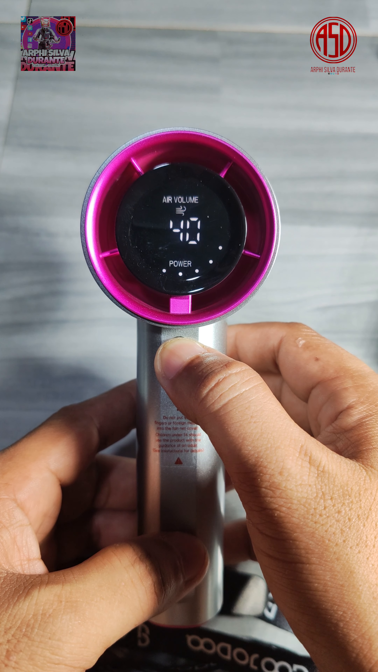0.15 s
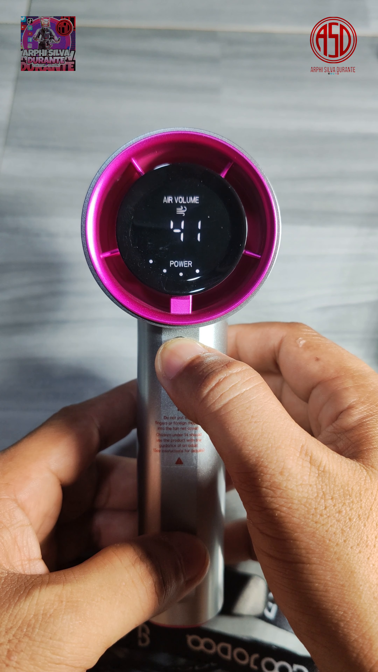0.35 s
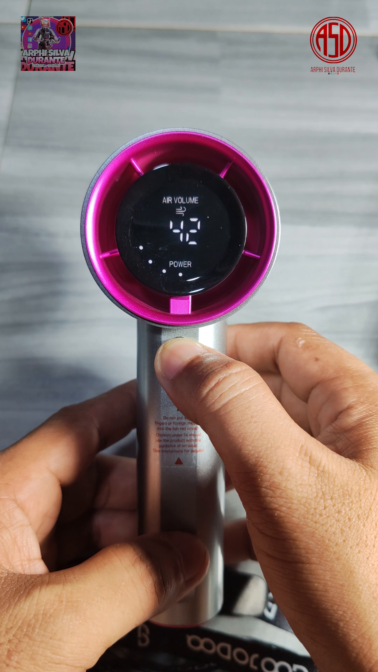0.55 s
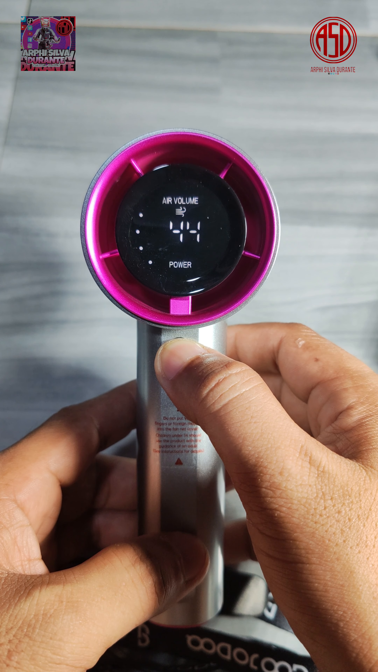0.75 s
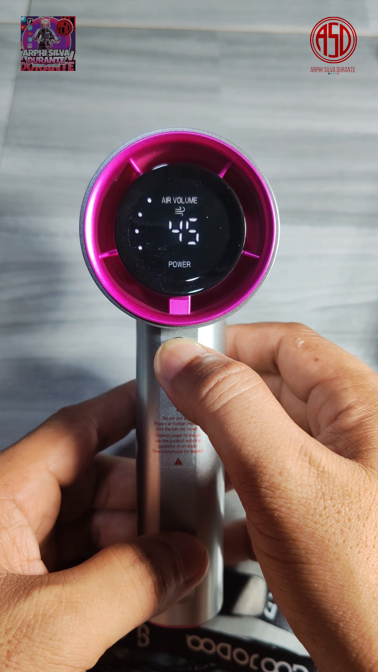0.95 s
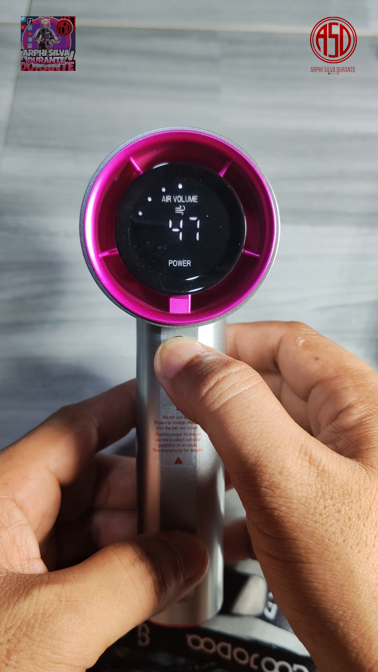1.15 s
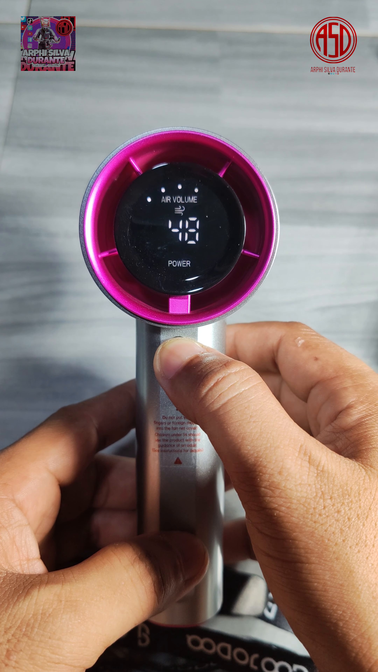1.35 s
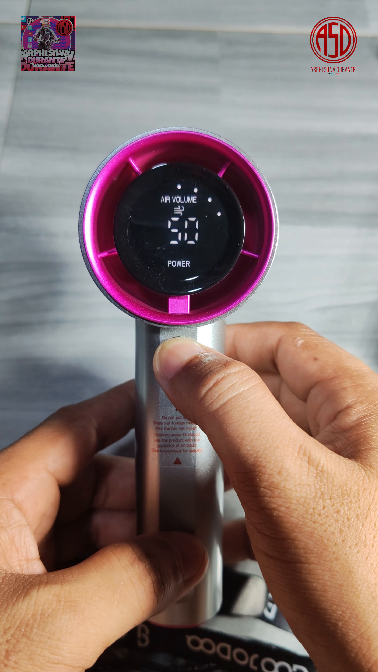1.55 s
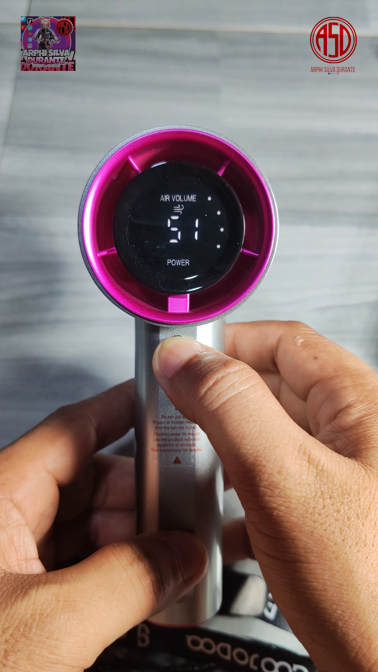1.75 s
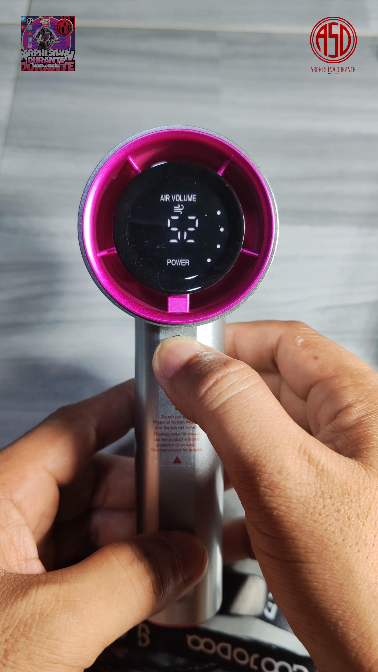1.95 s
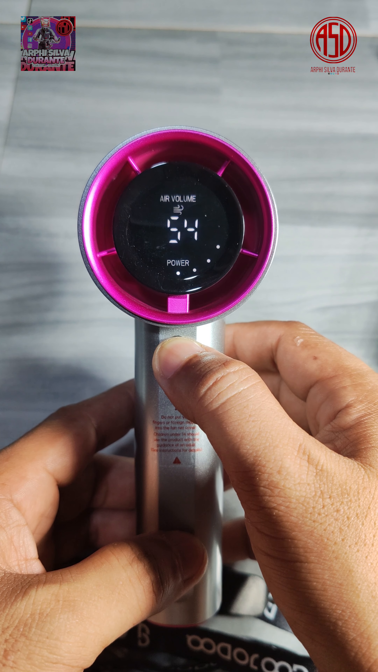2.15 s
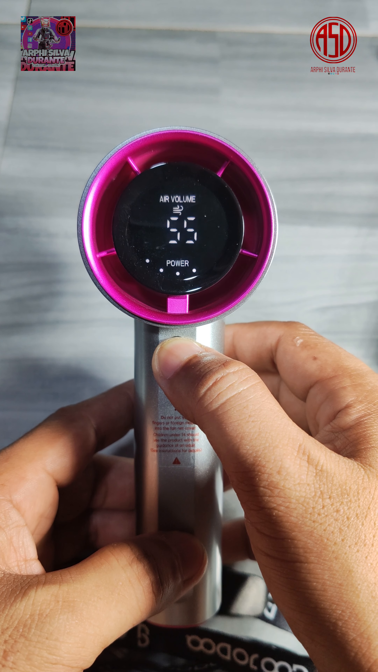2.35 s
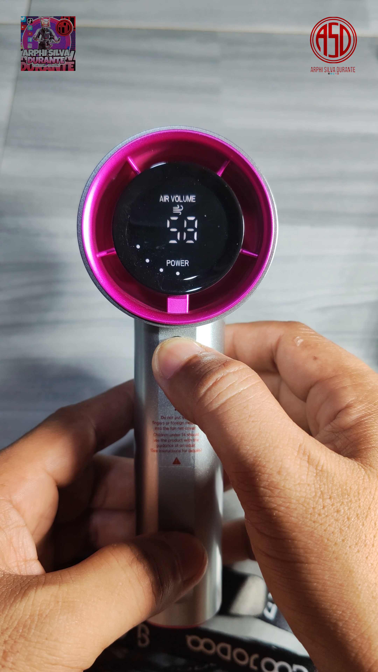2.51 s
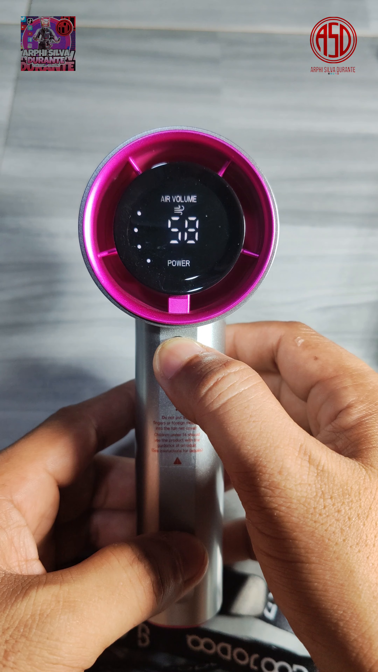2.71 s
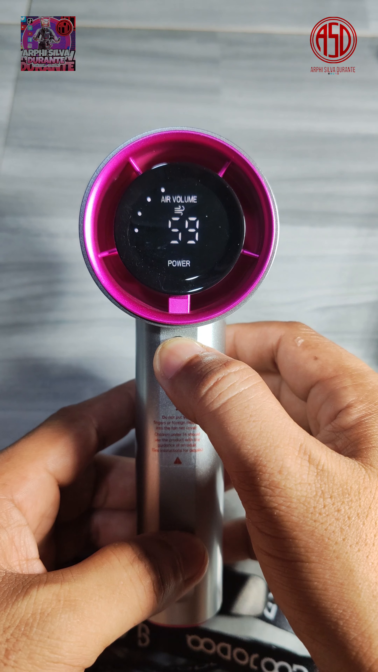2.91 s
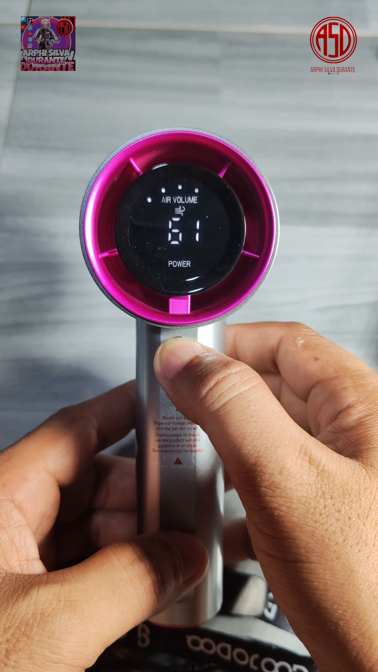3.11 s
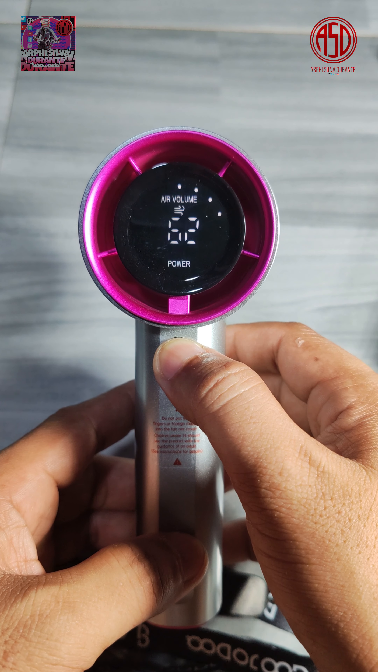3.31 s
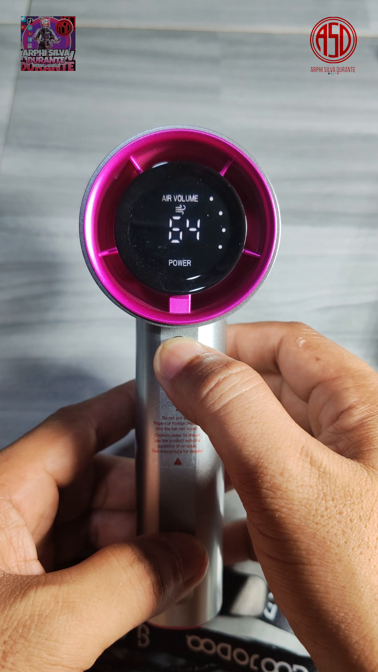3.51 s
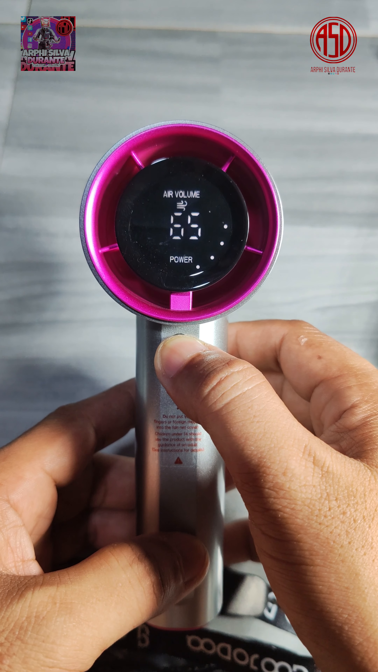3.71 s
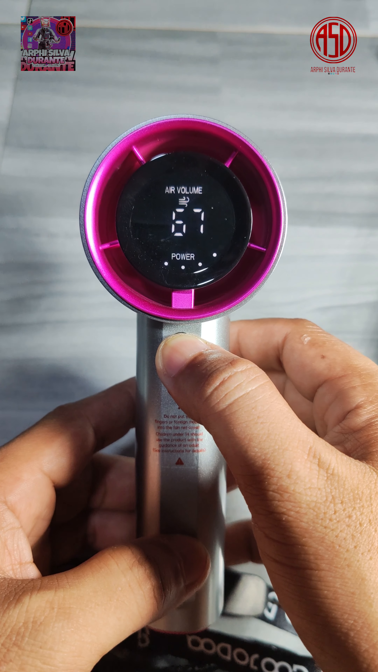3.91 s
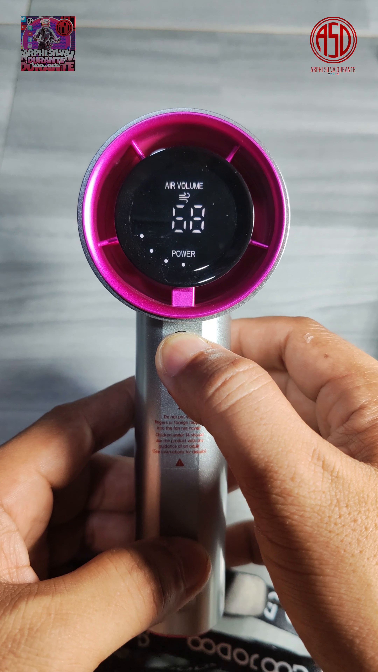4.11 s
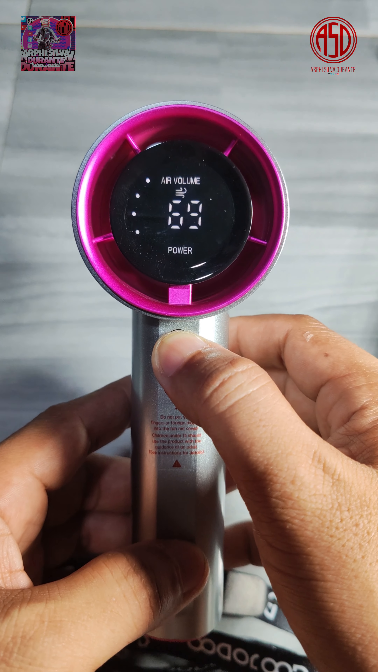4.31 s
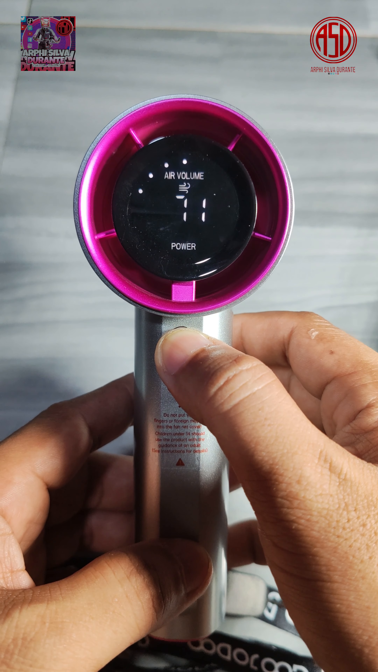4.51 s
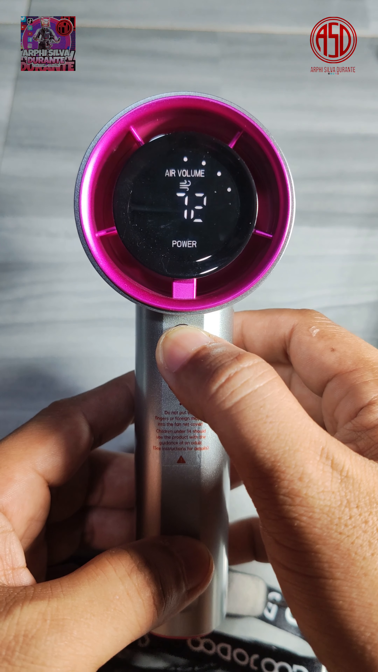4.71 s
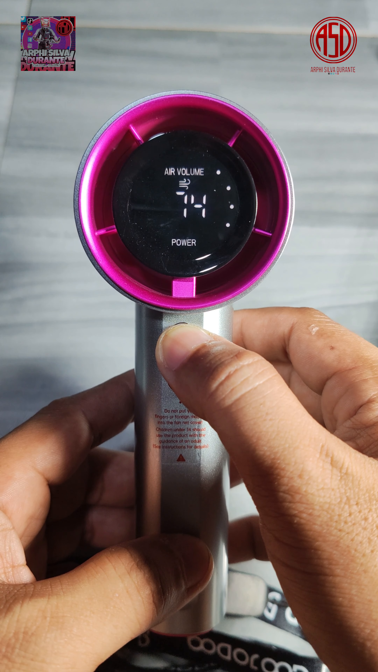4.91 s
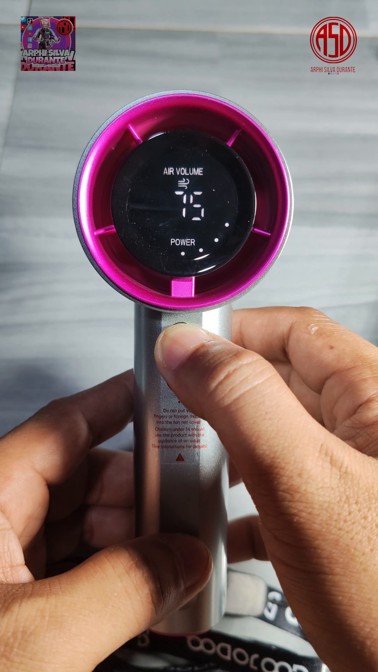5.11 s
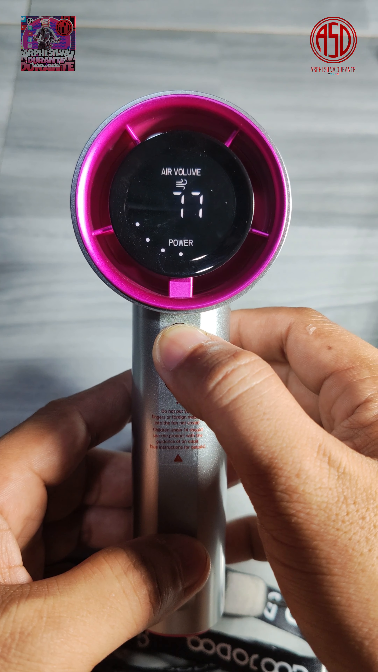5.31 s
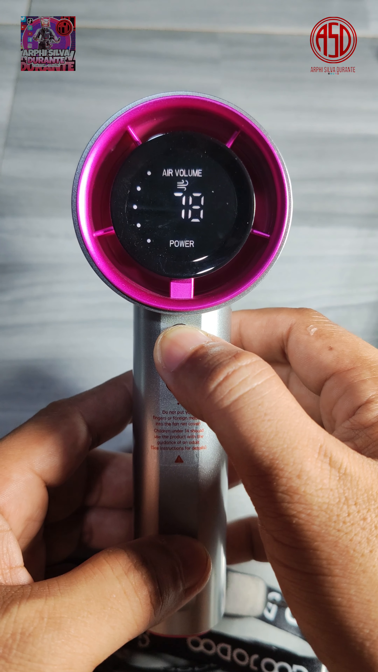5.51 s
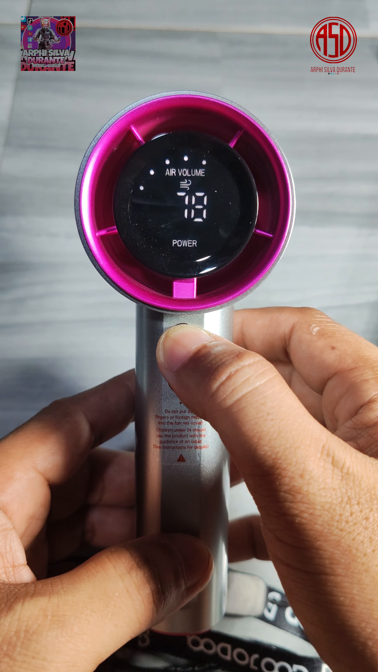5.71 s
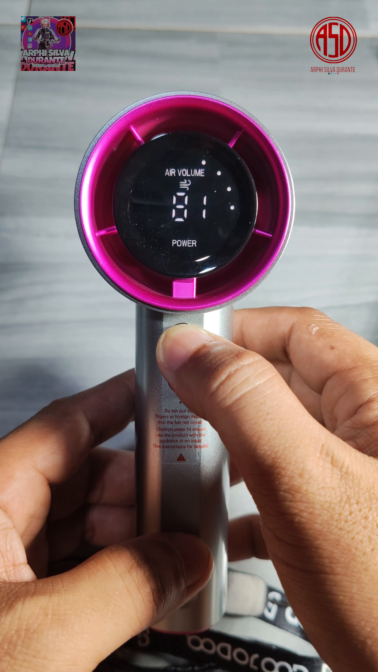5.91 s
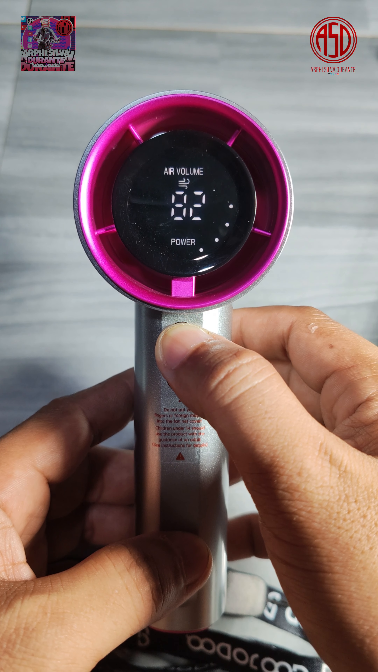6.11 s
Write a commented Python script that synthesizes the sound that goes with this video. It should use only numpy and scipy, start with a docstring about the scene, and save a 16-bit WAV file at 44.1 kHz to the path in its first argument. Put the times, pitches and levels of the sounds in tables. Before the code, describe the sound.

A small handheld fan is already running at the start, close to a stereo microphone indoors, and blows without a break for about six seconds. The loudest sound is its jet buffeting the left side: fluttering wind noise with irregular knocks, low thumps and crackle. The right side gets only faint, soft puffs. Beneath this, on both sides, air hisses and the motor gives a whine of several tones with a thin, very high whistle. The pitch climbs in about eight smooth, small steps, some tones briefly swelling as they rise. The hiss grows louder and brighter over the first 2.5 seconds, dips for an instant near 2.8, and changes colour slightly between 3.5 and 4.4 seconds. The wind gradually strengthens throughout, with its hardest knocks and sharpest crackle from about 4.5 seconds to the end, where the fan is still running.

```python
"""Handheld turbo fan, close up

A small fan is turned up step by step, close to a stereo microphone indoors. Its jet buffets the left
port with knocks, thumps and crackle, and only grazes the right one with soft puffs. Air hisses through
the duct and the rotor whines in rising tones. Part-way through, the hand lifts the fan a little,
and the hiss takes on a new colour."""
import sys
import numpy as np
from scipy import signal
from scipy.fft import rfft, irfft
from scipy.io import wavfile
from scipy.ndimage import uniform_filter1d, map_coordinates

SR = 44100
rng = np.random.default_rng(int(sys.argv[2]) if len(sys.argv) > 2 else 0)


def put_to_file(sound):
    """Save the sound as 16-bit audio at rate SR, in the file named by the first command-line argument."""
    columns = np.atleast_2d(sound).T  # one column per channel
    safe = np.clip(columns, -1, 1)
    whole_steps = np.round(safe * 32767)
    wavfile.write(sys.argv[1], SR, whole_steps.astype(np.int16))


N = 271215
TIME = np.arange(N) / SR
FREQS = np.maximum(np.fft.rfftfreq(N, 1 / SR), 1)

# strength of the jet at the left port as the hand sways the fan: (time [s], level [dB])
JET_ENVELOPE = [(0, -22), (.28, -23), (.47, -27), (.76, -21), (.87, -24), (1.16, -23.5), (1.3, -21.5),
                (1.53, -20.5), (1.76, -23.5), (1.98, -18.5), (2.12, -19), (2.42, -17), (2.53, -21),
                (2.62, -19), (2.78, -18.5), (2.85, -21), (2.95, -19.5), (3.14, -19), (3.25, -21.5),
                (3.38, -20), (3.45, -17.5), (3.51, -20.5), (3.555, -17.5), (3.68, -20), (3.79, -19.5),
                (3.9, -16.5), (4, -16.5), (4.15, -18), (4.42, -17), (4.54, -18), (4.62, -17), (4.83, -19),
                (4.95, -17), (5.15, -18), (5.57, -15.5), (5.67, -16), (5.8, -18), (5.93, -16), (6.15, -19)]
# colour of the turbulence on the left port: (frequency [Hz], density [dB per Hz])
BUFFET_SPECTRUM = [(20, -19), (43, -76), (65, -46), (95, -37), (145, -36.5), (195, -40.5), (260, -37),
                   (420, -43), (700, -51.5), (1100, -61), (1600, -70), (2400, -81), (4000, -90),
                   (9000, -125)]
# air rushing in the duct: (frequency [Hz], left [dB per Hz], right [dB per Hz])
RUSH_SPECTRUM = [(100, -83, -90), (350, -63, -77), (574, -68, -89), (975, -72, -78.5), (1610, -89.5, -80.5),
                 (3040, -81, -84), (3740, -81, -78.5), (4660, -83, -88), (6650, -78.5, -78.5),
                 (8550, -86.5, -86.5), (9030, -86.5, -89.5), (10600, -101, -101), (11800, -101, -103),
                 (15500, -108, -116)]
# ride on the treble hiss, with one brief dip: (time [s], gain [dB])
HISS_ENVELOPE = [(0, -7.5), (.4, -6.5), (.9, -4), (1.4, -2.5), (1.7, -1.5), (2, -1.4), (2.4, 0.2),
                 (2.75, 0.8), (2.785, -6), (2.83, 0.5), (2.9, -0.5), (3.8, 0.7), (4.45, -0.6), (4.65, 2.5),
                 (4.9, -0.3), (5.3, 1), (5.45, 0.5), (5.6, 1.5), (5.9, -1), (6, 0), (6.15, 3.5)]
# paths that bring the duct's noise to the right port after the left: (delay [s], gain [ratio])
RIGHT_PATHS = [(.00083, .33), (.00037, .16), (.00024, .16)]
# colour of the hiss in the first part, with a little extra at the very top: (centre [Hz], width [Hz], left
# [dB], right [dB])
HISS_EQ_EARLY = [(1310, 160, 0, 5), (1910, 260, 5, 9), (2280, 220, 4, 2), (2600, 200, 0, -3),
                 (3050, 300, -3, 0), (3500, 350, 2, 3), (4020, 380, 7, 5), (4600, 220, 1, 5),
                 (4930, 350, -3, -1), (5500, 380, 5, 3), (6340, 200, 1, 4), (7050, 250, 2, 2),
                 (7700, 250, -1, -3), (8380, 400, 1, 6), (10300, 280, -6, -7), (13200, 1300, 11, 4),
                 (15300, 1400, 3, 3)]
# colour of the hiss in the later part: (centre [Hz], width [Hz], left [dB], right [dB])
HISS_EQ_LATE = [(1890, 280, 4, 8), (2230, 200, 0, -3), (2450, 300, 4, 2), (3080, 250, -2, -1),
                (3600, 200, 3, 4), (3990, 220, 4, 7), (4350, 220, -3, -4), (4650, 200, 7, 2),
                (5070, 200, -2, -3), (5740, 200, 6, 3), (6330, 280, 0, 6), (7100, 280, 4, 1),
                (7450, 180, 0, 3), (8170, 240, 0, 6), (8950, 300, 2, 3), (10280, 250, -4, -6),
                (10600, 450, 2, 6), (13250, 900, 3, 0)]
# how far the hand has lifted the fan: (time [s], lift [0-1])
HAND_LIFT = [(0, 0.06), (3.5, 0.07), (4.4, 1), (6.15, 1)]
# steps up in rotor speed: (start [s], added speed [turns/s], length [s])
SPEED_SURGES = [(0.293, 5.821, 0.702), (0.976, 7.348, 0.668), (1.829, 7.155, 0.652), (2.535, 4.846, 0.636),
                (3.387, 4.763, 0.535), (4.066, 5.139, 0.604), (4.866, 5.078, 0.553), (5.645, 6.721, 0.418)]
# rotor tones, mostly multiples of the blade rate, order 6:
# (order [cycles/turn], left [dB], right [dB], change from slowest to fastest [dB], waver [0-1])
ROTOR_TONES = [(6, -56, -48, 0, .16), (12, -61, -63, 4, .45), (13, -69, -68, -15, .3),
               (18, -69, -68.5, 4, .3), (24, -63, -68.5, -7, .27), (25, -74, -77.5, -10, .3),
               (30, -69, -72, 10, .55), (36, -68, -70, 0, .55), (48, -73, -79, 0, .55),
               (72, -76.8, -87.5, -7.5, .15), (80, -104, -113, -6, .35), (96, -74, -85, -6, .25)]
# resonances that swell a tone climbing through them: (centre [Hz], width [Hz], left [dB], right [dB])
HOUSING_RESONANCES = [(972, 45, 10, 3), (1015, 45, 5, 3), (1055, 70, 6.5, 7.5), (1118, 52, 10, 9.5),
                      (1210, 90, 3, 7.3), (1280, 60, 3, 5), (1930, 70, 3, 10), (2050, 110, 1, 6),
                      (2250, 120, 7, 0), (2425, 110, 6.5, 0), (3400, 200, 8, 9), (3608, 105, 18, 16),
                      (3725, 80, 6, 10), (3928, 66, 12.5, 8), (3981, 42, 10.5, 7), (4090, 100, 13.5, 9),
                      (4205, 150, 10.3, 14), (11800, 700, 2, 3), (13440, 870, 23.5, 19),
                      (13150, 260, 11, 14), (14280, 320, 6, 3), (15680, 170, 7, 14)]
# sidebands that follow the whistle: (order [cycles/turn], below it left [dB], below it right [dB])
WHISTLE_SIDEBANDS = [(68, 26, 25), (74, 24, 8), (76, 26, 14)]
# hardest eddies on the left port: (time [s], knock level [dB], pitch [Hz], cavity ring level [dB])
HARD_EDDIES = [(0.0246, -2, 330.0, -46.0), (0.0938, -4.5, 430.0, -37.0), (0.2641, -4, 352, -40.0),
               (0.2898, -0.5, 332, -37.0), (0.3835, -5.5, 380.0, -45.0), (0.55, -6, 430.0, -46.0),
               (0.626, -3, 330.0, -42.0), (0.7425, 0, 322, -41.0), (0.7735, 0.5, 530.0, -46.0),
               (0.8005, -5.5, 330.0, -41.0), (0.9027, -12, 330.0, -37.0), (0.963, -2, 330.0, -46.0),
               (1.0235, -5, 430.0, -36), (1.309, -1, 332, -44.0), (1.3776, -7.5, 330.0, -24.5),
               (1.381, 3, 397, -25), (1.4782, -2.5, 374, -38), (1.527, -1, 330.0, -36),
               (1.547, -1.5, 400.0, -31), (1.5592, -6, 490.0, -46.0), (1.6559, 0, 350.0, -38.0),
               (1.8005, -9, 600.0, -40), (1.8268, -3, 330.0, -46.0), (1.976, -2.5, 530.0, -46.0),
               (2.0583, -2, 440, -40.0), (2.1754, -4, 352, -46.0), (2.186, 1, 350.0, -33),
               (2.2149, -10.5, 400.0, -46.0), (2.2713, 1, 430.0, -39), (2.4017, -10, 490.0, -28),
               (2.4374, 0, 354, -23.0), (2.4817, -6, 490.0, -46.0), (2.6114, -3.0, 430.0, -42.0),
               (2.6474, -12, 380.0, -38), (2.807, -1, 350.0, -46.0), (2.9115, -0.5, 430.0, -46.0),
               (2.9446, -3, 395, -39), (3.0574, -1.5, 348, -45.0), (3.1138, 0, 400.0, -46.0),
               (3.1619, 3, 382, -42), (3.3392, -4.5, 430.0, -43.0), (3.4317, -1, 431, -37.0),
               (3.4927, 1, 335, -46.0), (3.5584, -1.5, 407, -38.0), (3.6004, -3, 400.0, -40.0),
               (3.7446, 2.5, 330.0, -33.0), (3.8894, -2.0, 406, -37.0), (3.9292, -3, 460.0, -46.0),
               (3.9609, 2, 460.0, -42), (4.008, -1, 430.0, -46.0), (4.1243, -2, 460.0, -46.0),
               (4.187, 1, 382, -40.0), (4.2184, 1.5, 380.0, -46.0), (4.438, -1, 400.0, -24),
               (4.583, 3.5, 327, -45.0), (4.756, 1.5, 400.0, -25), (4.7614, 0, 400.0, -30),
               (4.7877, 1.5, 350.0, -46.0), (4.925, 3.5, 350.0, -22.5), (4.94, 3, 400.0, -27.0),
               (5.026, -3.0, 430.0, -28), (5.1844, -5, 560.0, -31), (5.28, -4, 430.0, -29),
               (5.461, -12, 900.0, -22), (5.4963, 3, 330.0, -24), (5.5332, -8, 460.0, -30),
               (5.576, 4.5, 380.0, -36.0), (5.6399, 0, 400.0, -26), (5.6629, -0.5, 600.0, -39.0),
               (5.683, -2, 460.0, -42.0), (5.8731, 1, 330.0, -26), (5.9132, 3, 380.0, -16)]
# modes of the port's cavity: (frequency [Hz], t60 [s])
CAVITY_MODES = [(1850, 0.014), (2520, 0.011)]
# stray puffs on the right port: (time [s], level [dB])
PUFFS = [(.145, -42), (.91, -44), (1.13, -47), (1.63, -34), (1.801, -37), (2.26, -38), (2.69, -41),
         (2.91, -42), (3.39, -41), (4.09, -36), (4.3, -39), (4.72, -44), (4.86, -38), (5.39, -40),
         (5.62, -39)]
# colour of those puffs: (frequency [Hz], relative level [dB])
PUFF_SPECTRUM = [(20, 1.5), (43, -17), (70, -3), (105, 8), (160, -1), (260, -11), (500, -26), (1500, -60)]
# largest eddies on the left port: (time [s], level [dB], pitch [Hz])
DEEP_THUMPS = [(0.489, -9.5, 132), (.945, -12, 129), (1.329, -10, 120), (2.139, -7, 132), (2.301, -9, 159),
               (2.401, -23, 149), (2.509, -13, 146), (2.61, -9, 149), (2.944, -11, 141), (4.117, -7, 141),
               (4.284, -8, 147), (4.45, -11, 148), (4.734, -6.5, 134), (4.943, -7, 156), (5.135, -4, 140),
               (5.625, -6.5, 152), (5.811, -7, 146)]


def from_db(db):
    """Decibels to gain."""
    return 10 ** (np.asarray(db) / 20)


def unit_rms(x):
    """Scale to unit rms."""
    return x / np.sqrt(np.mean(x ** 2) + 1e-20)


def envelope(rows):
    """A breakpoint curve at every sample."""
    return np.interp(TIME, *np.transpose(rows))


def bell(t, half_s):
    """A smooth swell of height 1 around t = 0."""
    return np.exp(-.5 * (t / half_s) ** 2)


def spectrum_db(rows):
    """The dB columns of a spectrum at every frequency, joined on a log axis."""
    hz, *columns = np.transpose(rows)
    return np.array([np.interp(np.log(FREQS), np.log(hz), column) for column in columns])


def peak_db(hz, width_hz, height_db, at=FREQS):
    """A bell-shaped EQ band."""
    return height_db * 2 ** -((2 * (at - hz) / width_hz) ** 2)


def stereo_eq_db(bands, at=FREQS):
    """Summed EQ bands, left and right."""
    return sum(peak_db(hz, width, np.array([[left], [right]]), at) for hz, width, left, right in bands)


def coloured(density_db, white=None):
    """Noise with the given dB per Hz in each row."""
    if white is None:
        white = rng.standard_normal((len(density_db), N))
    return irfft(rfft(white) * from_db(density_db) * np.sqrt(SR / 2), N)


def drift(rate_hz):
    """Random modulation of unit rms, mostly slower than rate_hz."""
    coarse_time = TIME[::16]
    count = len(coarse_time)
    hz = np.fft.rfftfreq(count, coarse_time[1])
    slow = irfft(rfft(rng.standard_normal(count)) / (1 + (hz / rate_hz) ** 2), count)
    return np.interp(TIME, coarse_time, unit_rms(slow))


def rotor_speed(start_hz=160.51, creep_hz_per_s=.668):
    """Turns per second: a steady creep plus a smooth rise for each surge."""
    rises = sum(gain * np.sin(np.pi / 2 * np.clip((TIME - s) / length, 0, 1)) ** 2
                for s, gain, length in SPEED_SURGES)
    return start_hz + creep_hz_per_s * TIME + rises


def throttle():
    """Rotor speed scaled to run from about -1/2 (slowest) to 1/2 (fastest)."""
    speed = rotor_speed()
    return (speed - speed.mean()) / np.ptp(speed)


def around_eddies(half_s, lead_s=0):
    """A swell of height 1 at, or just ahead of, every hard eddy."""
    swells = sum(bell(TIME - s + lead_s, half_s) for s, *_ in HARD_EDDIES)
    return np.minimum(swells, 1)


def turbulence(large_edge_hz=241, small_db=-.67, large_db=-.5):
    """The flapping jet sweeps eddies over the left port: faster air is both louder and brighter."""
    jet_db = envelope(JET_ENVELOPE)
    jet_db -= jet_db.mean()
    flap = np.tanh(drift(rate_hz=24.06))
    cores = around_eddies(half_s=.00198)  # a fast core pushes smaller turbulence aside
    lulls = around_eddies(half_s=.004, lead_s=.00804)  # the air slackens just ahead of it
    churn = .45 * np.tanh(.38 * drift(rate_hz=120)) / (1 + 2 * cores + lulls)
    air_speed = np.exp(churn - .1402 * lulls) * (1 + .0806 * cores)
    air_speed *= from_db(.25 * jet_db + .7347 * flap)
    air_speed /= air_speed.mean()
    density_db = spectrum_db(BUFFET_SPECTRUM)
    small_share = 1 / (1 + (large_edge_hz / FREQS) ** 4)
    small = coloured(density_db + 10 * np.log10(small_share))[0]
    large = coloured(density_db + 10 * np.log10(1 - small_share + 1e-12))[0]
    # small eddies are carried past at the local speed, like varispeed
    carried = map_coordinates(small, [np.cumsum(air_speed)], order=3, mode="mirror")
    carried *= air_speed ** .95 * from_db(small_db + .51 * jet_db)
    # large ones only swell and sink
    lumps_db = 1.5 * np.tanh(drift(rate_hz=6.3))
    swell = from_db(large_db + .29 * jet_db + flap + lumps_db)
    swell *= np.exp(1.22 * uniform_filter1d(churn, size=300))
    return (carried + swell * large) * (1 - .077 * cores)


def buffet(crackle_edge_hz=1740, crackle_db=-4.5, crackle_rise_db=11.5):
    """Wind rings the left port, and its finest eddies crackle harder as the fan speeds up."""
    pressure = turbulence() + thumps()
    at_port = rfft(pressure) * from_db(peak_db(hz=2400, width_hz=1300, height_db=1.5))
    fine_share = 1 / (1 + (crackle_edge_hz / FREQS) ** 6)
    body = irfft(at_port * (1 - fine_share), N)
    crackle = irfft(at_port * fine_share, N)
    return body + crackle * from_db(crackle_db + crackle_rise_db * throttle())


def duct_noise(eq_bands):
    """Resonant rushing air; the right port hears part of it late and the rest by way of the room."""
    direct, diffuse = rfft(rng.standard_normal((2, N)))
    paths = sum(gain * np.exp(-2j * np.pi * FREQS * delay) for delay, gain in RIGHT_PATHS)
    right = paths * direct + np.sqrt(1 - abs(paths) ** 2) * diffuse
    white = irfft(np.array([direct, right]), N)
    return coloured(spectrum_db(RUSH_SPECTRUM) + stereo_eq_db(eq_bands), white)


def duct_hiss(treble_hz=3200, body_follow=.41, flutter_db=.9):
    """The duct's hiss brightens as the fan is turned up, and crossfades from its early to late colour."""
    lift = np.clip(envelope(HAND_LIFT), 0, 1)
    air = np.sqrt(1 - lift) * duct_noise(HISS_EQ_EARLY) + np.sqrt(lift) * duct_noise(HISS_EQ_LATE)
    body = irfft(rfft(air) / (1 + (FREQS / treble_hz) ** 4), N)
    hiss_db = envelope(HISS_ENVELOPE)
    hiss = body * from_db(body_follow * hiss_db) + (air - body) * from_db(hiss_db)
    return hiss * from_db(flutter_db * drift(rate_hz=22))


def rotor_tone(angle, order, level_db, waver, waver_hz=11, right_lag_s=.0003):
    """One multiple of the rotation; it reaches the right port later, and reflections make it waver."""
    late_angle = np.interp(TIME - right_lag_s, TIME, angle)
    sides = []
    for phase in (order * angle, order * late_angle):
        in_phase = (1 + waver * drift(waver_hz)) * np.cos(phase)
        quadrature = waver * drift(waver_hz) * np.sin(phase)
        sides.append(unit_rms(in_phase + quadrature))
    return from_db(level_db) * np.array(sides)


def rotor_whine(whistle_order=72, jitter=.0002):
    """Hum, whines and a thin whistle climb with the rotor, swelling through the housing's resonances."""
    speed = rotor_speed() * (1 + jitter * drift(rate_hz=20))
    angle = 2 * np.pi * np.cumsum(speed) / SR
    drive = throttle()
    whine, levels_db = 0, {}
    for order, left_db, right_db, change_db, waver in ROTOR_TONES:
        swell_db = stereo_eq_db(HOUSING_RESONANCES, at=order * speed)
        levels_db[order] = np.array([[left_db], [right_db]]) + change_db * drive + swell_db
        whine += rotor_tone(angle, order, levels_db[order], waver)
    for order, left_db, right_db in WHISTLE_SIDEBANDS:
        sideband_db = levels_db[whistle_order] - [[left_db], [right_db]]
        whine += rotor_tone(angle, order, sideband_db, waver=.25)
    return whine


def knocks(trim_db=-2):
    """A hard eddy's core crosses the left port as one sharp pressure swing and rings its cavity."""
    track = np.zeros(N)
    phases = rng.uniform(0, 2 * np.pi, len(HARD_EDDIES))
    for (s, knock_db, hz, ring_db), phase in zip(HARD_EDDIES, phases):
        near = slice(*np.searchsorted(TIME, [s - .03, s + .03]))
        t = TIME[near] - s
        swing = np.real(np.exp(1j * phase) / (1 - 1j * np.pi * hz * t) ** 3)  # spectrum peaks at hz
        after = np.maximum(t, 0)
        ring = sum(np.sin(2 * np.pi * mode_hz * after) * from_db(-60 * after / t60)
                   for mode_hz, t60 in CAVITY_MODES)
        track[near] += from_db(knock_db + trim_db) * swing + from_db(ring_db) * ring
    return track


def puffs(half_s=.03, draught_db=-54, draught_swing_db=9):
    """The jet's edge brushes the right port with soft puffs of rumble over a weak, uneven draught."""
    swells = sum(from_db(db) * bell(TIME - s, half_s) for s, db in PUFFS)
    draught = from_db(draught_db + draught_swing_db * drift(rate_hz=6))
    rumble = unit_rms(coloured(spectrum_db(PUFF_SPECTRUM))[0])
    return np.hypot(swells, draught) * rumble


def thumps(half_s=.0076):
    """The largest eddies shove the left port with a few swings of deep pressure."""
    phases = rng.uniform(0, 2 * np.pi, len(DEEP_THUMPS))
    return sum(from_db(db) * bell(TIME - s, half_s) * np.cos(2 * np.pi * hz * (TIME - s) + phase)
               for (s, db, hz), phase in zip(DEEP_THUMPS, phases))


def scene():
    """Wind stays on its own port; the fan's hiss and whine reach both."""
    wind = np.array([buffet() + knocks(), puffs()])
    return wind + duct_hiss() + rotor_whine()


def record(dry, low_cut_hz=87, high_cut_hz=15750, knee=6):
    """The microphone drops the deepest rumble, soft-clips the hardest hits and cuts the very top."""
    low_cut = signal.butter(4, low_cut_hz, "high", fs=SR, output="sos")
    thinned = signal.sosfilt(low_cut, dry)
    rounded = thinned / (1 + abs(thinned) ** knee) ** (1 / knee)
    high_cut = np.clip((high_cut_hz - FREQS) / 50 + 1, 0, 1)
    return irfft(rfft(rounded) * high_cut, N)


dry = scene()
out = record(dry)
put_to_file(out)
```